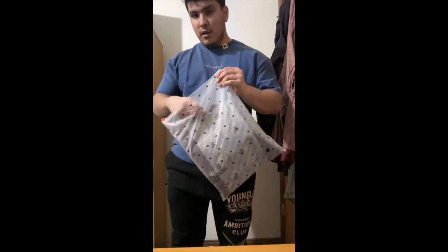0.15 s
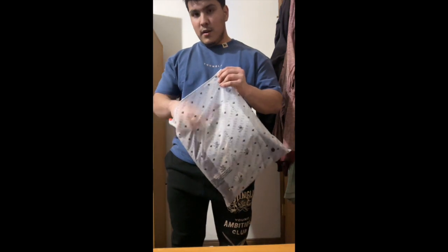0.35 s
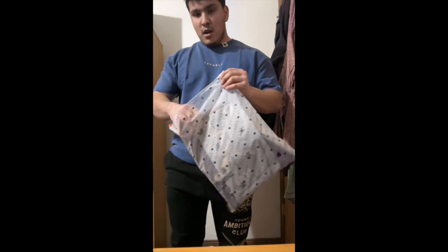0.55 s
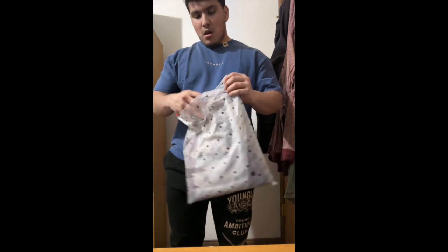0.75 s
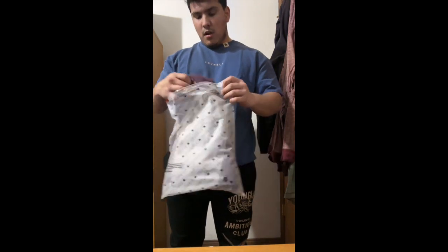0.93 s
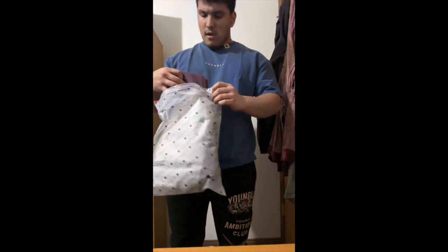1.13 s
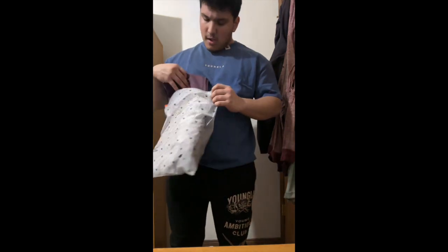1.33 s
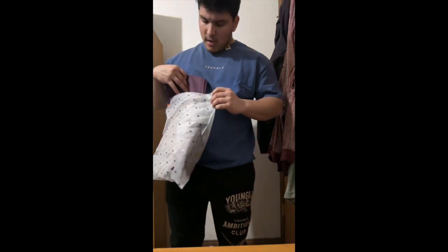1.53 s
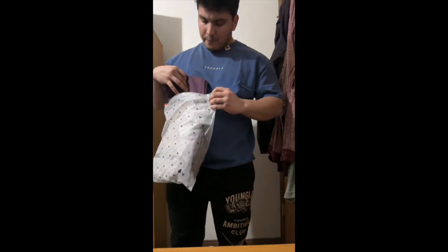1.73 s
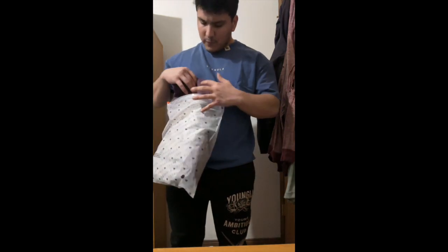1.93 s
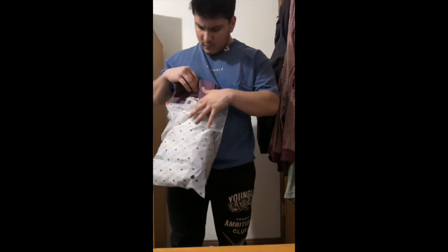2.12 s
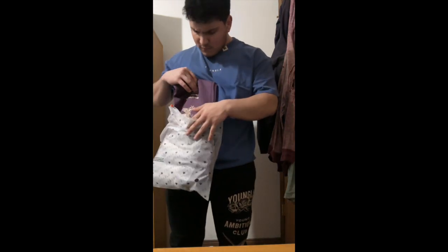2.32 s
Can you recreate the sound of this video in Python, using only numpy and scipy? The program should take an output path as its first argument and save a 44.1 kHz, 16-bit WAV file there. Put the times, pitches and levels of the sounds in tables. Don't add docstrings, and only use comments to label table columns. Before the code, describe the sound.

Hands crumple a thin plastic bag, pulling it open with growing crackle, then reach inside more quietly before one sharp, loud rustle that dies away; close stereo microphone in a small quiet room.

```python
import sys
import numpy as np
from scipy import signal
from scipy.fft import rfft, irfft, next_fast_len
from scipy.io import wavfile
from scipy.ndimage import uniform_filter1d, map_coordinates

SR = 44100
rng = np.random.default_rng(int(sys.argv[2]) if len(sys.argv) > 2 else 0)


def digitize_waveform(pressure):
    field = np.atleast_2d(pressure).T
    bounded = np.clip(field, -1, 1)
    quanta = np.round(bounded * 32767).astype(np.int16)
    wavfile.write(sys.argv[1], SR, quanta)


def voltage_ratio(decibels):
    exponent = np.asarray(decibels, float) / 20
    return 10 ** exponent


N = 108882
SIZE = next_fast_len(N + SR // 2)
HZ = np.maximum(np.arange(SIZE // 2 + 1) * SR / SIZE, 1)
PORT_LAG_MS = 0.067


def rms_one(x):
    return x / np.sqrt(np.mean(x ** 2) + 1e-20)


def gain_at(points):
    hz, db = np.transpose(points)
    return voltage_ratio(np.interp(np.log(HZ), np.log(hz), db))


def db_over_time(points):
    return np.interp(np.arange(N) / SR, *np.transpose(points))


def colour(x, response):
    return irfft(rfft(x, SIZE) * response, SIZE)[..., :N]


def drift(rate_hz):
    r = np.exp(-2 * np.pi * rate_hz / SR)
    smooth = signal.lfilter([1], [1, -2 * r, r * r], rng.standard_normal(N + SR))
    return rms_one(smooth[SR:])


def ring(clicks, hz, cycles):
    r = voltage_ratio(-60 * hz / cycles / SR)
    w = 2 * np.pi * hz / SR
    return signal.lfilter([0, np.sin(w)], [1, -2 * r * np.cos(w), r * r], clicks + 1e-18)


def grains(per_s, spread_db, clump_db):
    sizes = voltage_ratio(spread_db * np.minimum(rng.exponential(1, N), 2.3))
    signs = rng.choice([-1, 1], N)
    chance = per_s * voltage_ratio(clump_db * drift(25)) / SR
    return sizes * signs * (rng.random(N) < chance)


def dealt(clicks, low_hz, high_hz, cycles, count):
    pick = rng.integers(0, count, N)
    total = np.zeros(N)
    for k, hz in enumerate(np.geomspace(low_hz, high_hz, count)):
        total += hz * ring(clicks * (pick == k), hz, cycles)
    return rms_one(total)


def hits(rows, cycles, soft):
    out = np.zeros(N + SR)
    t = np.arange(SR // 20) / SR
    bright = signal.butter(2, [1500, 9000], "band", fs=SR)
    noise = signal.lfilter(*bright, rng.standard_normal((len(rows), len(t))))
    cracks = noise * t * np.exp(-t / 0.00028)
    for (s, db, hz, *brightness), crack in zip(rows, cracks):
        rise = 1 - np.exp(-t * hz / soft)
        shape = voltage_ratio(-60 * t * hz / cycles) * rise * np.sin(2 * np.pi * hz * t)
        shape = shape / np.abs(shape).max()
        for b in brightness:
            shape = shape + voltage_ratio(min(b + 4, 0)) * crack / np.abs(crack).max()
        start = int(s * SR)
        out[start:start + len(t)] += voltage_ratio(db) * shape / np.abs(shape).max()
    return out[:N]


# frequency in Hz, level in dB per Hz.
ROOM_TONE = [(30, -44), (57, 5.5), (80, -4.5), (117, -3), (160, -16), (700, -24.5), (4000, -20),
             (16000, -55)]


def room_tone():
    return voltage_ratio(-63) * rms_one(colour(rng.standard_normal(N), gain_at(ROOM_TONE)))


# frequency in Hz, side over mid in dB.
ECHO_WIDTH = [(60, -17), (250, -8.5), (790, 5), (1300, -13), (2400, 2), (5000, -5), (8000, -2), (14000, 3)]


def room(x, count=16):
    t60_s, level_db, move_s = 0.12, -6.5, 0.08
    t = np.arange(SR // 3) / SR
    spot = np.arange(N) / SR / move_s - np.arange(count)[:, None]
    away = np.abs((spot + count / 2) % count - count / 2)
    near = np.cos(np.pi / 2 * np.clip(away, 0, 1))
    dying = rng.standard_normal((2, count, len(t))) * voltage_ratio(-60 * t / t60_s) * (t > 0.002)
    mid, side = (rfft(dying, SIZE) * rfft(x * near, SIZE)).sum(axis=1)
    scale = voltage_ratio(level_db) / np.sqrt(t60_s * SR / 14)
    return scale * irfft(mid + side * gain_at(ECHO_WIDTH) * [[1], [-1]], SIZE)[:, :N]


# frequency in Hz, level in dB per Hz.
CONTENTS_COLOUR = [(40, -17.5), (110, -2), (210, -7), (290, -4), (520, -1), (750, -10.5), (1300, -5.5),
                   (2200, -18)]


def contents(slump_db):
    clicks = grains(800, spread_db=3, clump_db=3.0)
    thuds = dealt(clicks, 81.6, 1570, cycles=2.8, count=12)
    rub = 0.38 * rng.standard_normal(N)
    return voltage_ratio(slump_db) * rms_one(colour(thuds + rub, gain_at(CONTENTS_COLOUR)))


# start in seconds, peak in dB, pitch in Hz.
BUMP_HITS = [
    (.153, -38, 93),
    (.272, -40, 97),
    (.37, -48, 111),
    (.51, -43, 102),
    (1.87, -55.5, 60.5),
    (1.01, -48, 112),
    (1.31, -45, 118),
]


def bumps():
    return hits(BUMP_HITS, cycles=7.2, soft=0.8)


# start in seconds, peak in dB, pitch in Hz.
PANEL_POPS = [(0.034, -35.5, 1170), (0.054, -28, 1230), (0.123, -43, 1500), (0.209, -36, 579),
              (0.225, -34.5, 1700), (0.258, -37, 690), (0.269, -35, 580), (0.318, -62, 403),
              (0.356, -27.5, 1720), (0.482, -38, 370), (0.514, -35.5, 880), (0.554, -40, 554),
              (0.654, -24, 1560), (0.813, -31.5, 1130), (0.994, -34.5, 1300), (1.056, -35, 1020),
              (1.069, -38, 334), (1.079, -42, 288), (1.419, -48, 1800), (1.896, -45.5, 700)]


def pops():
    rise_s = 0.0017
    return np.roll(hits(PANEL_POPS, cycles=6.5, soft=1.0), int(rise_s * SR))


# start in seconds, peak in dB, pitch in Hz.
TINY_CREASES = [(0.0084, -35, 12300), (0.1386, -35, 12300), (0.1775, -45, 12400), (0.2039, -42, 12700),
                (0.2244, -28.5, 13900), (0.2693, -34, 14000), (0.3062, -52, 13700), (0.3341, -44, 12500),
                (0.4214, -29, 10200), (0.4653, -40, 13800), (0.4838, -45, 13800), (0.6566, -27, 11300),
                (0.7153, -39, 11600), (0.73, -30, 11300), (0.8829, -38, 13900), (1.0465, -36, 12600),
                (1.1348, -45, 11000), (1.1887, -49, 10900), (1.2531, -30, 10700), (1.3688, -32, 11100),
                (1.3744, -42, 13200), (1.4556, -41, 13600), (1.532, -39, 12600), (1.696, -57, 11600),
                (1.7804, -47, 12600), (1.828, -47, 10400), (2.0378, -53, 10800), (2.1331, -28, 10100),
                (2.2134, -27, 12000), (2.2184, -40, 13100)]


def ticks():
    return hits(TINY_CREASES, cycles=8.0, soft=0.43)


# start in seconds, peak in dB at the left port, pitch in Hz, brightness in dB.
FOLD_SNAPS = [(0.0015, -26.5, 5770, -26), (0.014, -24.5, 4870, -18), (0.1316, -35, 1480, 0),
              (0.1396, -47, 3030, -3), (0.2588, -33, 1380, -3), (0.2695, -28, 1290, -3),
              (0.4933, -31.5, 1450, -10), (0.596, -29, 4860, -12), (0.9038, -26, 2790, -1),
              (1.6013, -59, 2140, -8), (1.7622, -39, 3300, -6), (1.8946, -48, 1500, -2),
              (1.9425, -36.5, 2080, 0), (2.197, -21, 3860, -16), (2.2345, -21, 4450, -10),
              (2.2485, -24, 4900, -15), (2.185, -34, 1460, -3), (2.214, -31, 1610, -4),
              (0.152, -26, 3560, -17), (0.1788, -19, 4950, -9.5), (0.2252, -25, 6040, -2),
              (0.355, -19.5, 5450, 3), (0.6581, -16, 5240, -18), (0.8001, -45, 1770.0, -10),
              (0.8068, -31, 3340, -16), (0.8139, -16.5, 7400, -0.5), (0.8554, -40, 3300, -12),
              (0.8802, -31, 4900, 5), (0.8841, -18, 5170, 0), (0.9082, -20, 3960, -5),
              (0.9552, -20, 7560, -3.5), (1.0388, -25.5, 1800, -18), (1.1897, -30.6, 2600, -29),
              (1.3699, -28, 1440, 0.5), (1.3813, -30, 2520, -9), (1.4923, -21.5, 7950, -20),
              (1.5348, -36.5, 1490, -12), (1.6765, -39.5, 4170, 0), (1.7234, -40.5, 12580.0, -16),
              (1.7627, -34, 1270, -7), (1.7745, -35.5, 4750, -5), (1.8308, -35, 1730, -2),
              (1.8434, -31.5, 5000, 3), (1.8631, -33.5, 13240.0, -4), (2.0419, -38, 4150, -22),
              (2.22, -23, 5860, 1), (2.2552, -30.5, 1420, -1), (2.4402, -43, 8460.0, 7)]


def snaps():
    return hits(FOLD_SNAPS, cycles=10.1, soft=0.41)


# frequency in Hz, level in dB per Hz.
FILM_COLOUR = [(250, -15.5), (700, -6), (1400, -0.53), (3000, -1.8), (5500, 0), (9500, -4), (12000, -4.5),
               (16000, -8.5)]
# time in seconds, level in dB.
CREASING = [(0, 6), (.8, -1.5), (1.2, 3), (2.0, 1), (2.06, -2.5), (2.47, -4)]
# time in seconds, level in dB.
TAUTNESS = [(0, -2), (.1, -3), (.2, -1), (.3, -4.5), (.36, 7), (.46, -4), (.6, -2), (.75, -1), (.9, 3),
            (1.05, -0.5), (1.3, 3), (1.45, -1), (1.65, 0.5), (1.85, -5.5), (2.0, 0), (2.14, 1.5),
            (2.24, -2), (2.47, -2.5)]


def film(crumple_db):
    clicks = grains(2000, spread_db=2.5, clump_db=4.5)
    creases = dealt(clicks, 420, 7270, cycles=4.16, count=24)
    burst = np.arange(60) * np.exp(-np.arange(60) / 9)
    burst_level = np.convolve(np.abs(grains(270, spread_db=4.1, clump_db=6.2)), burst)[:N]
    bursts = rms_one(burst_level * rng.standard_normal(N))
    slide = rng.standard_normal(N) * voltage_ratio(1 * drift(32))
    creasing = voltage_ratio(db_over_time(CREASING))
    mix = creasing * (voltage_ratio(-2.5) * creases + voltage_ratio(-10.5) * bursts) + voltage_ratio(-3) * slide
    mix = rms_one(colour(mix, gain_at(FILM_COLOUR)))
    treble = colour(mix, 1 / (1 + (7040 / HZ) ** 6))
    mix = mix + (voltage_ratio(db_over_time(TAUTNESS)) - 1) * treble
    stick_db = 1.5 * drift(135)
    return voltage_ratio(crumple_db + stick_db) * mix


# time in seconds, crumpling of the film in dB, slump of the contents in dB.
OPENING_GRIPS = [
    [(0, -57.5, -67.5), (.03, -49, -47.5), (.06, -49.5, -48), (.10, -54, -58)],
    [(.115, -54.5, -48.5), (.14, -46, -48), (.22, -46, -49.5), (.25, -52.5, -54), (.27, -50, -52),
     (.34, -44.5, -48), (.40, -45.5, -53), (.43, -49.5, -55), (.465, -54.5, -59.5)],
    [(.475, -45, -46), (.49, -41, -48.5), (.56, -43.5, -51), (.64, -44.5, -56.5), (.665, -40, -49),
     (.70, -47.5, -56), (.785, -42, -61)],
    [(.81, -40, -56), (.84, -40.5, -51), (.91, -38.5, -50), (1.0, -43.5, -50.5), (1.08, -42.5, -52.5),
     (1.12, -50.5, -53), (1.175, -58, -64)],
]
# time in seconds, crumpling in dB, slump in dB.
REACHING_GRIPS = [
    [(1.195, -46.5, -55.5), (1.235, -48, -63), (1.30, -42.5, -53.5), (1.35, -49, -56.5), (1.38, -42, -59),
     (1.48, -51.5, -56.5), (1.58, -57, -66.5), (1.668, -68, -74)],
    [(1.68, -54, -69.5), (1.75, -56.5, -60.5), (1.81, -60.5, -68), (1.83, -50, -54.5), (1.88, -57, -63),
     (1.92, -49.5, -64), (1.96, -52.5, -69), (2.02, -67.5, -69)],
    [(2.04, -43.5, -58.5), (2.10, -36, -63), (2.12, -40.5, -63), (2.154, -32.5, -55.5), (2.245, -34.5, -50),
     (2.30, -38, -61), (2.385, -49.5, -61), (2.41, -57.5, -81), (2.47, -60, -90)],
]


def rustle():
    grips = list(OPENING_GRIPS) + list(REACHING_GRIPS)
    s, crumple_db, slump_db = np.transpose([row for grip in grips for row in grip])
    t = np.arange(N) / SR
    return film(np.interp(t, s, crumple_db)) + contents(np.interp(t, s, slump_db))


def scene():
    tone = room_tone()
    handling = rustle()
    single = snaps() + pops() + bumps() + ticks()
    late = colour(single, np.exp(-2j * np.pi * HZ * PORT_LAG_MS / 1000))
    lag = PORT_LAG_MS * SR / 1000 * (1 + 0.08 * drift(10.3))
    late = late + map_coordinates(handling, [np.arange(N) - lag], order=5)
    direct = np.array([handling + single, late])
    return direct + room(handling + voltage_ratio(-5) * single) + tone + 1.2 * room(tone)


ATTACK_TIMES = [.011, .15, .22, .266, .475, .661, .963, 1.195, 1.683, 1.729, 1.822, 1.868, 2.031, 2.217,
                2.449]


def thinned(halves, frame=1024, grid=480):
    mid_low_hz, mid_high_hz, side_low_hz, side_high_hz, top_hz = 6850, 9000, 11030, 14950, 15750
    rise = np.cumsum(np.kaiser(frame + 1, 4 * np.pi))
    window = np.sqrt(np.r_[rise[:frame], rise[frame - 1::-1]] / rise[-1])
    bins = np.arange(frame) + 0.5
    waves = np.cos(np.pi / frame * np.outer(np.arange(2 * frame) + 0.5 + frame / 2, bins))
    basis = window[:, None] * waves * np.sqrt(2 / frame)
    lead = 2 * frame - grid
    padded = np.pad(halves, ((0, 0), (lead, 3 * frame)))
    out = np.zeros((2, N + 6 * frame))
    hz = bins * SR / 2 / frame
    steps_hz = 345 * rng.choice([0, 0, 0, 1, 1, 2], (N // frame + 4, 5))
    for k, step in enumerate(steps_hz[:-1]):
        distance = np.abs(np.array(ATTACK_TIMES) * SR - (k - 1) * frame - grid)
        attack = np.min(distance) < frame / 2
        mid_gap = (hz > mid_low_hz + step[0] / 2) & (hz < mid_high_hz + max(step[1], step[4]))
        side_gap = (hz > side_low_hz + step[2] / 2) & (hz < side_high_hz - step[3] + step[4])
        keep = (attack | ~np.array([mid_gap, side_gap])) & (hz < top_hz)
        span = slice(k * frame, (k + 2) * frame)
        out[:, span] += (padded[:, span] @ basis * keep) @ basis.T
    return out[:, lead:][:, :N]


# start in seconds, length in seconds.
FULL_RANGE_MOMENTS = [
    (0.814, 0.0071),
    (1.376, 0.0027),
    (1.482, 0.011),
    (2.444, 0.0046),
]


def full_range_at_moments(halves):
    t = np.arange(N) / SR
    inside = sum((t >= s) & (t < s + length) for s, length in FULL_RANGE_MOMENTS)
    full = uniform_filter1d(inside * 1.0, size=128)
    return full * halves + (1 - full) * thinned(halves)


# frequency in Hz, left over right in dB.
PORT_TILT = [(60, -1), (130, -1.5), (290, -1.5), (640, 4), (1410, 0.5), (3100, 0), (6820, 0.5), (15000, 0)]


def ports(dry):
    tilt = np.sqrt(gain_at(PORT_TILT))
    return colour(dry, np.array([tilt, 1 / tilt]))


def roll_off(x):
    return signal.sosfilt(signal.butter(12, 16500, fs=SR, output="sos"), x)


def record(dry):
    left, right = ports(dry)
    mid, side = full_range_at_moments(np.array([left + right, left - right]) / 2)
    return roll_off(np.array([mid + side, mid - side]))


dry = scene()
out = record(dry)
digitize_waveform(out)
```